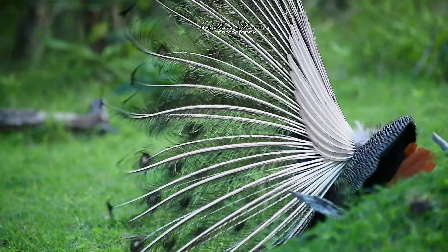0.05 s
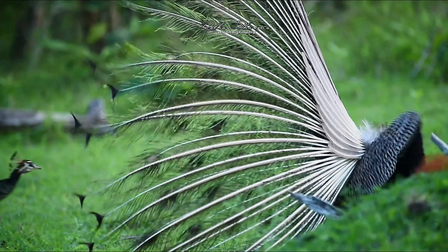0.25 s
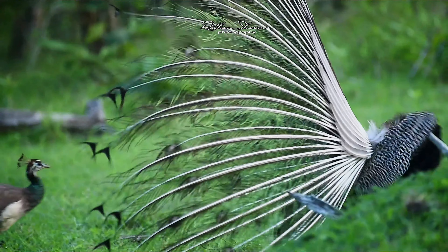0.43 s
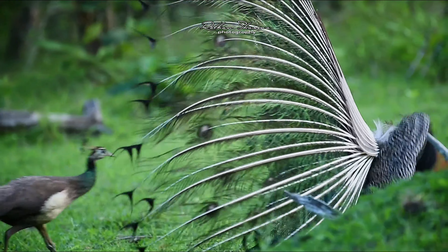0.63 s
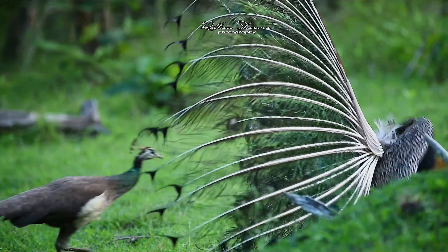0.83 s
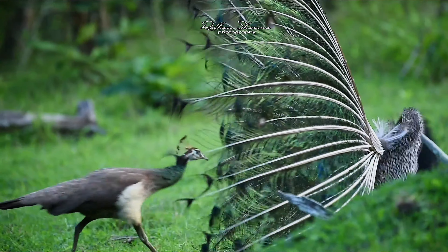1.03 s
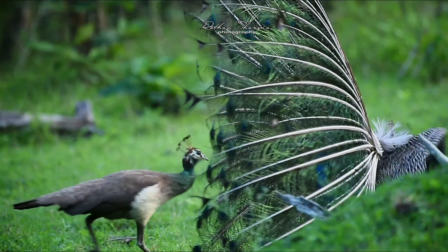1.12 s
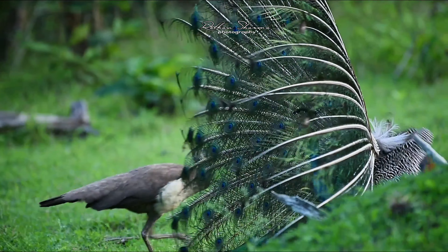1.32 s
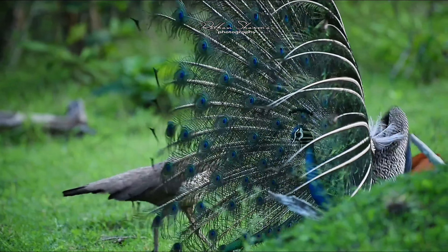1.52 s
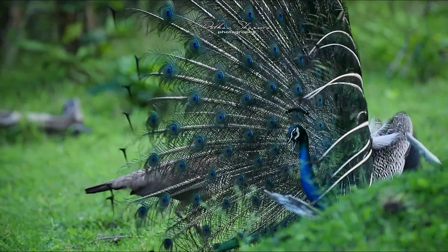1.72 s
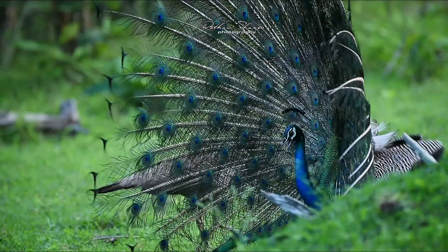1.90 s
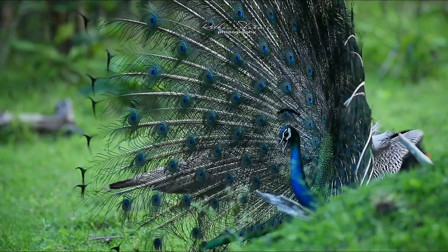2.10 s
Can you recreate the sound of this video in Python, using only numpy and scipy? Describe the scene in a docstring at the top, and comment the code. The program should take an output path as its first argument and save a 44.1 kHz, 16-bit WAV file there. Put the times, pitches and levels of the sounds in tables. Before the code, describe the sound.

A peacock calls twice, loud and nasal, each cry climbing into a piercing wail and dropping back with a rasp. The second is shorter. Trees around the lawn return a long echoing tail over faint outdoor hiss.

```python
"""Peacock calling among trees

Two loud wailing calls on a lawn ringed by trees. Each climbs in a nasal low register, breaks into
a piercing wail and falls back with a rasp: summed harmonics plus noise gated once a cycle.
Decaying noise convolved with the calls gives the long tail of trunks and foliage.
Coloured noise gives a faint outdoor rumble and hiss."""
import sys
import numpy as np
from scipy import signal
from scipy.fft import rfft, irfft
from scipy.io import wavfile
from scipy.ndimage import uniform_filter1d

SR = 44100
rng = np.random.default_rng(int(sys.argv[2]) if len(sys.argv) > 2 else 0)


def unload_wav(signal):
    """Save mono or channel-first audio to the path in sys.argv[1] as 16-bit WAV at rate SR, clipped to [-1, 1]."""
    wavfile.write(
        sys.argv[1],
        SR,
        np.round(np.clip(np.atleast_2d(signal).T, -1, 1) * 32767).astype(np.int16),
    )


N = 94815

# Open-air background spectrum, relative: freq_hz, density_db
AIR_SPECTRUM = [(25, -6), (140, -6.5), (330, -9), (600, -13), (850, -19), (1300, -15), (2300, -12),
                (4000, -12), (6500, -10), (8200, -7), (11000, -17), (15400, -31)]
# Register changes, one row per call: start_s, break_up_s, break_down_s, end_s
CALL_TIMES = [(.117, .308, .878, 1.047), (1.288, 1.448, 1.732, 1.895)]
# Pitch of each call before jitter: time_s, pitch_hz
PITCH_CALL_1 = [(0.118, 516), (0.171, 543), (0.202, 545.8), (0.267, 583), (.295, 586.7), (0.327, 619.6),
                (0.373, 640.1), (.48, 645), (0.578, 651.1), (0.749, 652.8), (0.831, 646.6), (0.866, 622.4),
                (.895, 601.6), (.98, 571), (1.015, 547), (1.046, 506)]
PITCH_CALL_2 = [(1.285, 535), (1.329, 559.3), (1.36, 574), (1.396, 580.3), (1.438, 609.6), (1.465, 631),
                (1.52, 650.5), (1.592, 651.6), (1.645, 653.5), (1.72, 641.5), (1.75, 616.7), (1.789, 582.6),
                (1.835, 567.4), (1.89, 522.5)]
# Strength of each call before trims: time_s, body_level_db, treble_level_db
EFFORT_CALL_1 = [(0.135, -37.5, -57.5), (0.243, -26, -32), (0.321, -25.5, -34), (0.355, -23, -30),
                 (0.401, -21.5, -24), (0.419, -21.5, -24), (0.567, -22, -28), (0.691, -18, -28.5),
                 (0.767, -22.5, -29), (0.821, -22.5, -37.5), (0.967, -21, -35.5), (1.04, -30.5, -47)]
EFFORT_CALL_2 = [(1.3, -34, -42), (1.328, -26.5, -39.5), (1.378, -23.5, -25.5), (1.474, -22, -38.5),
                 (1.546, -23, -26), (1.628, -21, -27), (1.668, -20, -27), (1.69, -24.5, -40.5),
                 (1.716, -19.5, -39), (1.728, -25, -45), (1.758, -19.5, -38), (1.812, -26, -43.5),
                 (1.818, -23, -38), (1.848, -28, -53), (1.885, -27.5, -52)]
# Hoarseness through both calls: time_s, roughness_0_to_1
HOARSENESS = [(.12, 0.15), (.24, 0.24), (.33, 0.38), (.42, 0.14), (.55, 0), (.7, 0.1), (.82, 0),
              (.88, 0.49), (1.03, 0.82), (1.3, 0.06), (1.38, 0.17), (1.46, .55), (1.53, 0.21), (1.63, 0.13),
              (1.71, 0.28), (1.78, 0.6), (1.88, 0.88)]
# Harmonics of the low register and each wail, relative: harmonic_number, level_db
NASAL_HARMONICS = [(1, -12), (2, -4), (3, -2.5), (4, 2), (5, -1.5), (6, -8.5), (7, -15.5), (8, -20),
                   (9, -10), (10, -10), (11, -13), (13, -13.5), (16, -20.5), (18, -25.5), (20, -31.5),
                   (24, -42), (26, -44)]
WAIL_HARMONICS_1 = [(1, -19), (2, -21), (3, -1), (4, -18.5), (5, -9), (6, -19.5), (7, -18.5), (8, -15),
                    (9, -18.5), (10, -14.5), (11, -16.5), (12, -17.5), (13, -17.5), (14, -18.5),
                    (15, -17.5), (16, -17.5), (17, -22), (18, -25), (19, -28), (20, -32), (21, -35),
                    (23, -40), (26, -61)]
WAIL_HARMONICS_2 = [(1, -17), (2, -14.5), (3, 2.5), (4, -17), (5, -13), (6, -18.5), (7, -11), (8, -8),
                    (9, -13.5), (10, -6.5), (11, -17.5), (12, -40), (13, -18), (14, -18), (15, -15.5),
                    (16, -15.5), (17, -23), (18, -27.5), (19, -48), (21, -46), (23, -50), (26, -60)]
# Air rushing in the throat, relative: freq_hz, density_db
RASP_SPECTRUM = [(400, -55), (900, -56), (1500, -34), (1900, -10), (2200, -11), (2500, -6), (3200, -3),
                 (4500, 10.5), (6500, -0.5), (9000, 2), (11000, -5.5), (13000, -8), (15500, -22)]
# Colour of all tree scatter: freq_hz, gain_db
TREE_COLOUR = [(300, -13), (650, 7.5), (1300, 7), (2200, 4.5), (3200, 9.5), (5000, 10.5), (7000, 5),
               (10000, 11), (15000, -7)]
# Decay of the long tail: freq_hz, t60_s
TREE_DECAY = [(500, 0.51), (2000, 1.21), (5000, 1.24), (9000, 0.53), (15000, 0.82)]
# Colour of the late echo, relative: freq_hz, gain_db
EDGE_COLOUR = [(500, 7), (2000, 8), (5000, 9.5), (12000, -4)]

# _RATE_HZ: random steps per second; depths in dB, rad or fraction are rms
AIR_DB, AIR_SWELL_DB, AIR_SWELL_RATE_HZ = -49, .5, 6
PORTS_APART_HZ = 1750  # diffuse sound is independent at the two microphones above this

ATTACK_S, RELEASE_S, BREAK_S = .009, .012, .016
BODY_TRIM_DB, TREBLE_TRIM_DB, TREBLE_HZ = 0.55, -1, 3940
WAIL_DB = 1.2  # added to the body in the wail
# Dull start: slope above OPEN_HZ; pinched end: slope either side of CLOSE_HZ (body only)
OPEN_S, OPEN_DB_PER_OCT, OPEN_HZ = .14, 14, 1700
CLOSE_S, CLOSE_DB_PER_OCT, CLOSE_HZ = 0.047, 2, 2350
# Harmonics waver as the bird turns; depths reached at TREBLE_HZ and above
FLUTTER_DB, FLUTTER_RAD, FLUTTER_RATE_HZ = 2.5, 0.51, 13.95
# Unsteadiness at full hoarseness: pitch, overall level, separate harmonics
JITTER_FRACTION, JITTER_RATE_HZ = 0.0089, 420
WOBBLE_FRACTION, WOBBLE_RATE_HZ = 0.00579, 70
SHIMMER_DB, SHIMMER_RATE_HZ = 3, 120
BREAKUP_DB, BREAKUP_RATE_HZ = 5.5, 70  # grows with frequency up to TREBLE_HZ
HOARSE_LOSS_DB = 4.5  # body lost at full hoarseness
RASP_DB, RASP_GATE_DEPTH = -1, .55
RASP_TREBLE_SHARE = .65  # rasp level between body (0) and treble (1)
PAN_DB, PAN_TREBLE_DB = -1.7, -2.3  # left minus right; the second adds for treble harmonics
PORT_LAG_S = .00001  # left after right

# Echo levels before TREE_COLOUR
FAR_DB, FAR_ONSET_S = -12, 0.043
NEAR_DB, NEAR_S = -24, 0.047
EDGE_DB, EDGE_S, EDGE_SPREAD_S = -29.5, 0.422, 0.026
SWAY_RAD, SWAY_RATE_HZ = 0.75, 6.04
TOP_HZ = 15400


def amp(db):
    """Decibels to gain."""
    return 10 ** (np.asarray(db) / 20)


def curve(rows, axis=1):
    """One table column, joined by straight lines in time."""
    rows = np.array(rows)
    return np.interp(np.arange(N) / SR, rows[:, 0], rows[:, axis])


def at(rows, hz):
    """Table read on a log-frequency axis."""
    rows = np.array(rows)
    return np.interp(np.log(hz + 1), np.log(rows[:, 0]), rows[:, 1])


def colour(x, rows):
    """Filter by a spectrum of freq_hz, gain_db points."""
    gain = amp(at(rows, np.fft.rfftfreq(N, 1 / SR)))
    return irfft(rfft(x) * gain, N)


def unit(x):
    """Scale to rms 1."""
    return x / np.sqrt(np.mean(x ** 2))


def walk(rate_hz):
    """Smoothed random steps, rms 1."""
    steps = rng.standard_normal(N // 32)
    place = np.arange(N) * (rate_hz / SR)
    joined = np.interp(place, np.arange(len(steps)), steps)
    return unit(uniform_filter1d(joined, max(int(SR / rate_hz), 2)))


def gate(start_s, end_s, rise_s, fall_s):
    """Linear gate: starts to open at start_s, shut at end_s."""
    t = np.arange(N) / SR
    return np.clip((t - start_s) / rise_s, 0, 1) * np.clip((end_s - t) / fall_s, 0, 1)


def ports(x):
    """Two close microphones hear diffuse bass alike and diffuse treble apart."""
    side_power = np.minimum(np.fft.rfftfreq(N, 1 / SR) / PORTS_APART_HZ, 1) ** 4 / 2
    mid, side = irfft(rfft(x) * np.sqrt([1 - side_power, side_power]), N)
    return np.array([mid + side, mid - side])


def air():
    """Open air: coloured noise, diffuse in stereo, with a slight random swell."""
    hiss = colour(rng.standard_normal((2, N)), AIR_SPECTRUM)
    return unit(ports(hiss)) * amp(AIR_DB + AIR_SWELL_DB * walk(AIR_SWELL_RATE_HZ))


def register(rows, hz, count=26):
    """Complex harmonic gains of a pulse ringing the throat; body and treble each have unit power."""
    rows = np.array(rows)
    k = np.arange(1, count + 1)
    gain = amp(np.interp(k, rows[:, 0], rows[:, 1]))
    # minimum phase from the mirrored log spectrum
    log_gain = np.log(np.r_[gain[0] / 2, gain, gain[-2::-1]])
    lag_rad = signal.hilbert(log_gain).imag[k]
    high = k * hz > TREBLE_HZ
    norm = np.where(high, np.linalg.norm(gain[high]), np.linalg.norm(gain[~high]))
    return gain / norm * np.exp(-1j * lag_rad), high


def peacock(times, pitch, effort, wail):
    """One call: uneven pulses in two registers, with air rushing once a cycle."""
    start_s, up_s, down_s, end_s = times
    t = np.arange(N) / SR
    sides = np.array([[.5], [-.5]])  # left, right
    rough = np.clip(curve(HOARSENESS), 0, 1)
    wailing = gate(up_s - BREAK_S / 2, down_s + BREAK_S / 2, BREAK_S, BREAK_S)

    hz = curve(pitch)
    unsteady = JITTER_FRACTION * walk(JITTER_RATE_HZ) + WOBBLE_FRACTION * walk(WOBBLE_RATE_HZ)
    phase = 2 * np.pi * np.cumsum(hz * (1 + rough * unsteady)) / SR
    body_db = curve(effort) + BODY_TRIM_DB + WAIL_DB * wailing
    treble_db = curve(effort, axis=2) + TREBLE_TRIM_DB
    opening = np.clip(1 - (t - start_s) / OPEN_S, 0, 1)
    closing = np.clip(1 - (end_s - t) / CLOSE_S, 0, 1)

    peak_hz = hz.max()
    low_gain, _ = register(NASAL_HARMONICS, peak_hz)
    wail_gain, high = register(wail, peak_hz)
    voice = 0
    for i in range(len(wail_gain)):
        k = i + 1
        partial_hz = k * peak_hz
        spread = min(partial_hz / TREBLE_HZ, 1)
        tone = low_gain[i] * (1 - wailing) + wail_gain[i] * wailing
        if high[i]:
            db = treble_db + sides * PAN_TREBLE_DB
        else:
            dull_db = OPEN_DB_PER_OCT * opening * np.maximum(np.log2(k * hz / OPEN_HZ), 0)
            pinch_db = CLOSE_DB_PER_OCT * closing * abs(np.log2(k * hz / CLOSE_HZ))
            db = body_db - dull_db - pinch_db - HOARSE_LOSS_DB * rough
        flutter = walk(FLUTTER_RATE_HZ) + sides * walk(FLUTTER_RATE_HZ)
        db = db + spread ** 2 * FLUTTER_DB * flutter
        db = db + spread * BREAKUP_DB * rough * walk(BREAKUP_RATE_HZ)
        turn_rad = FLUTTER_RAD * spread * walk(FLUTTER_RATE_HZ) - np.pi * partial_hz * PORT_LAG_S
        angle = k * phase + np.angle(tone) + 2 * sides * turn_rad
        voice = voice + np.sqrt(2) * abs(tone) * amp(db) * np.cos(angle)

    puffs = rng.standard_normal((2, N)) * (1 + RASP_GATE_DEPTH * np.cos(phase)) ** 2
    rasp_db = body_db + RASP_TREBLE_SHARE * (treble_db - body_db) + RASP_DB
    rasp = unit(colour(puffs, RASP_SPECTRUM)) * rough * amp(rasp_db)
    level_db = SHIMMER_DB * rough * walk(SHIMMER_RATE_HZ) + sides * PAN_DB
    return (voice + rasp) * amp(level_db) * gate(start_s, end_s, ATTACK_S, RELEASE_S)


def trees(x):
    """Quick scatter from ground and bushes, a long dulling tail from the wood, a late echo off its far edge."""
    t, hz = np.arange(N) / SR, np.fft.rfftfreq(N, 1 / SR)
    noise, far = rfft(rng.standard_normal((2, N))), 0
    centres_hz = np.geomspace(500, 16000, 6)
    # overlapping bands, each with its own decay
    for centre_hz, share in zip(centres_hz, np.eye(len(centres_hz))):
        fade = amp(-60 * t / at(TREE_DECAY, centre_hz)) * (1 - np.exp(-t / FAR_ONSET_S))
        band = irfft(noise * np.interp(np.log(hz + 1), np.log(centres_hz), share), N)
        far = far + band * fade / np.linalg.norm(fade)
    # cubed noise: sparse, spiky reflections
    near = rng.standard_normal((2, N)) ** 3 * np.exp(-t / NEAR_S) * (1 - np.exp(-2 * t / NEAR_S))
    burst = rng.standard_normal((2, N)) * np.exp(-((t - EDGE_S) / EDGE_SPREAD_S) ** 2)
    edge = colour(burst, EDGE_COLOUR)
    early_late = (amp(NEAR_DB) * unit(near) + amp(EDGE_DB) * unit(edge)) / np.sqrt(N)
    echo = ports(colour(amp(FAR_DB) * far + early_late, TREE_COLOUR))
    return signal.fftconvolve(x, echo, axes=1)[:, :N]


def scene():
    """Background, two calls and their echo; moving foliage turns it between two scatter patterns."""
    calls = peacock(CALL_TIMES[0], PITCH_CALL_1, EFFORT_CALL_1, WAIL_HARMONICS_1)
    calls = calls + peacock(CALL_TIMES[1], PITCH_CALL_2, EFFORT_CALL_2, WAIL_HARMONICS_2)
    sway_rad = SWAY_RAD * walk(SWAY_RATE_HZ)
    echo = np.cos(sway_rad) * trees(calls) + np.sin(sway_rad) * trees(calls)
    return air() + calls + echo


def record(dry):
    """Steep elliptic low-pass at TOP_HZ: the recorder cuts the top."""
    return signal.sosfilt(signal.ellip(10, .2, 80, TOP_HZ, fs=SR, output="sos"), dry)


dry = scene()
out = record(dry)
unload_wav(out)
```